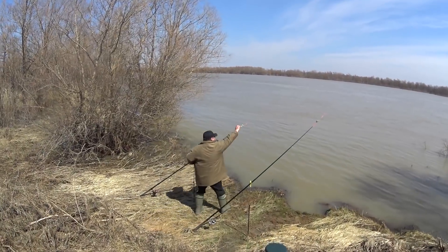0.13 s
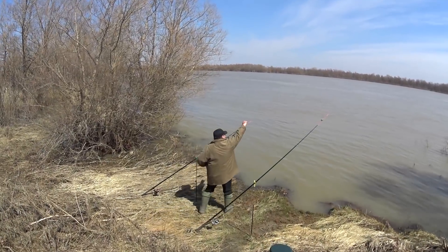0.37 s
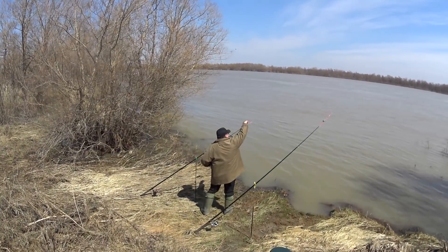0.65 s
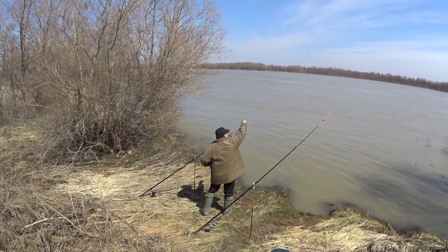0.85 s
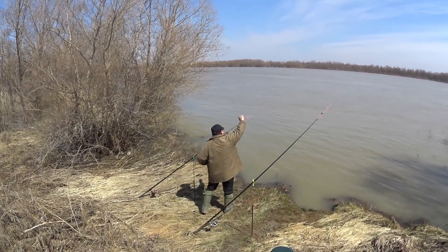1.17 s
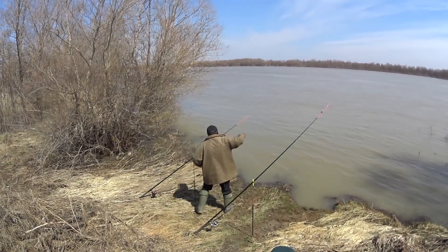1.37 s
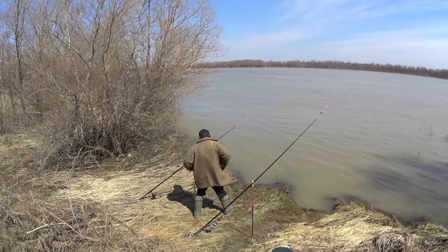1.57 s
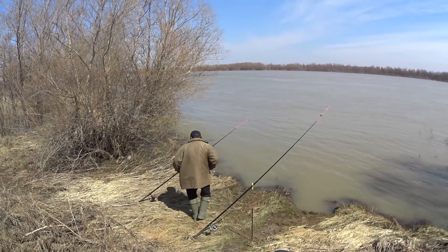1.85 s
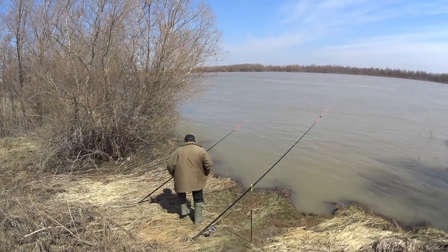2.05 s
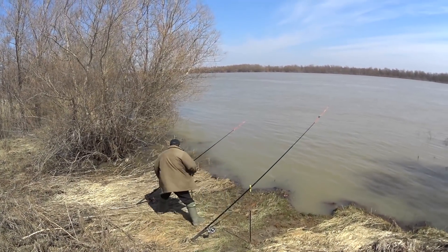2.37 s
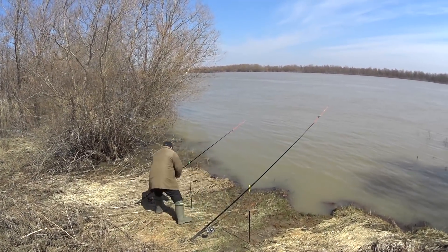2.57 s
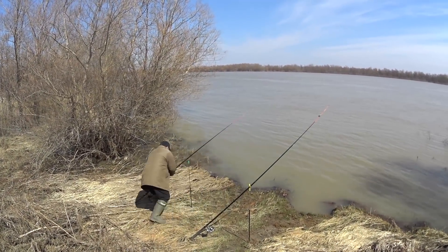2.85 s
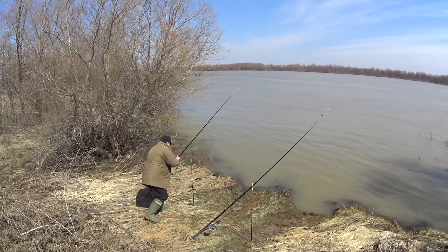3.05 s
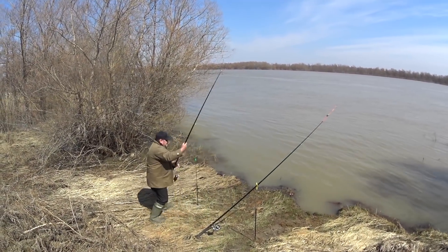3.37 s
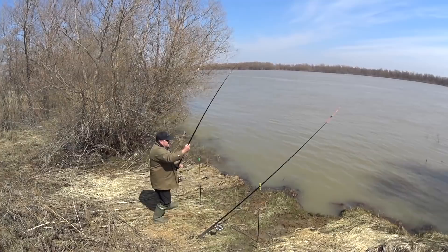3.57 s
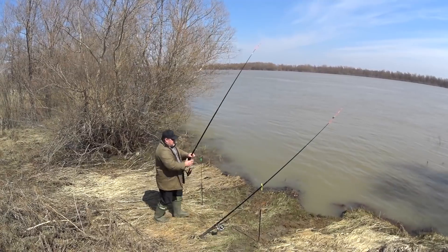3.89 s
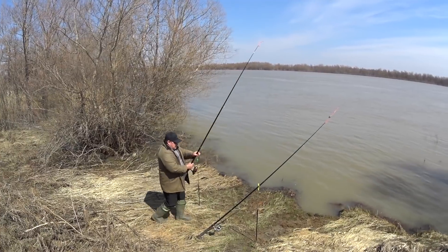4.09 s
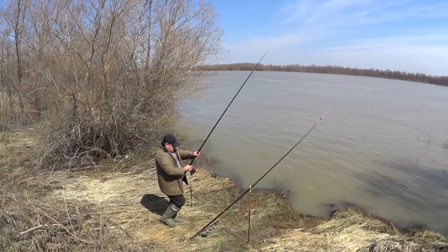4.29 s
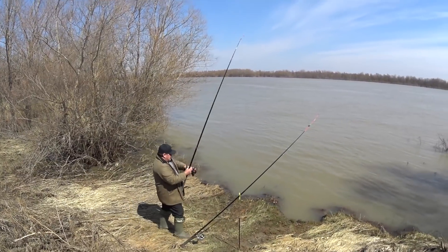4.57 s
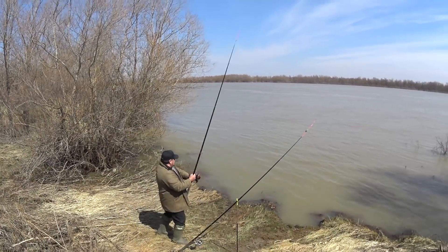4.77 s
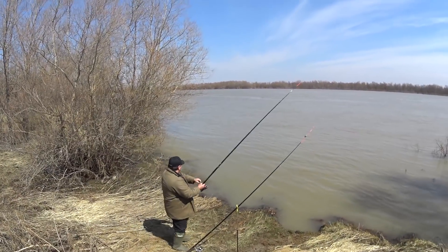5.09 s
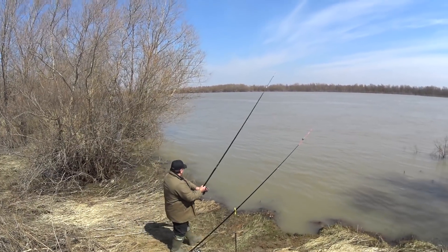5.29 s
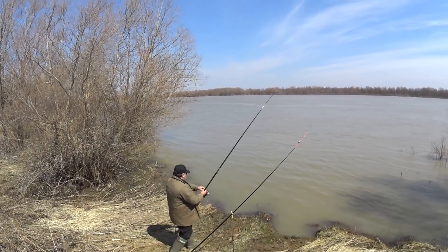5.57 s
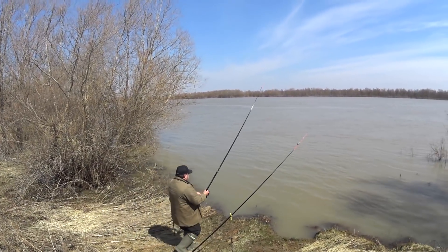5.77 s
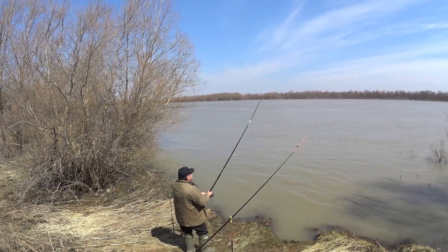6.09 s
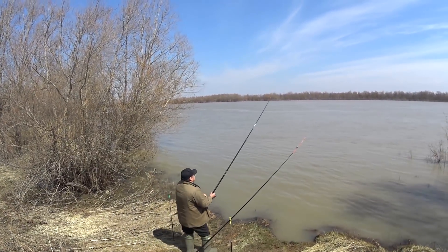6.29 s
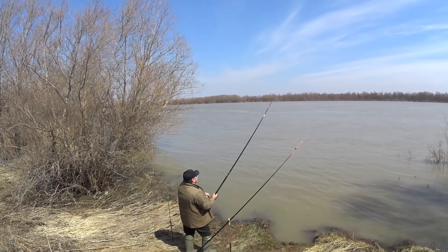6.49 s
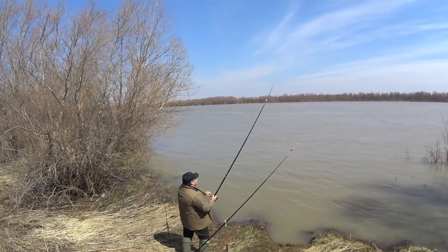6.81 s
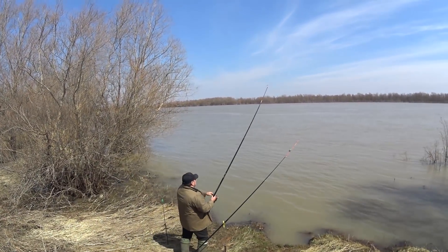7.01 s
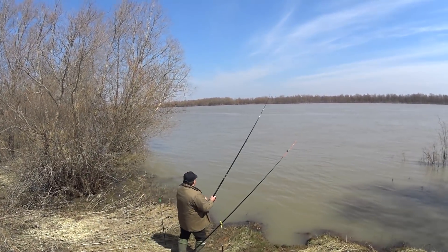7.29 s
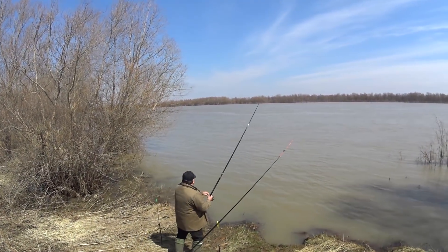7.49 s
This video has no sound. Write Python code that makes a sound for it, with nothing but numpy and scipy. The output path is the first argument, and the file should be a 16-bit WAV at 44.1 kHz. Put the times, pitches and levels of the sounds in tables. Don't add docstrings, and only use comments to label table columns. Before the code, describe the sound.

Two tiny bite bells jingle in an angler's hand, boots crackle through dry riverbank grass, then a reel whines in jerky bursts.

```python
import sys
import numpy as np
from scipy import signal
from scipy.fft import rfft, irfft, next_fast_len
from scipy.io import wavfile
from scipy.ndimage import uniform_filter1d, map_coordinates

SR = 44100
rng = np.random.default_rng(int(sys.argv[2]) if len(sys.argv) > 2 else 0)


def transcribe(signal):
    frames = np.atleast_2d(signal).T
    limited = np.clip(frames, -1, 1)
    pcm = np.round(limited * 32767).astype(np.int16)
    wavfile.write(sys.argv[1], SR, pcm)


def voltage_ratio(level):
    return 10 ** (np.asarray(level, float) / 20)


N = 337365


def unit(x):
    return x / np.sqrt(np.mean(x ** 2) + 1e-20)


def along(points, hz):
    f, value = np.transpose(points)
    return np.interp(np.log(hz + 1), np.log(f + 1), value)


def curves(rows):
    s, *columns = np.transpose(rows)
    return [np.interp(np.arange(N) / SR, s, column) for column in columns]


def wobble(rate):
    knots = rng.standard_normal(int(N * rate / SR) + 4)
    return map_coordinates(knots, [np.arange(N) * rate / SR])


def filtered(x, response):
    m = next_fast_len(N + SR // 2)
    return irfft(rfft(x, m) * response(np.fft.rfftfreq(m, 1 / SR)), m)[..., :N]


def coloured(x, spectrum):
    return unit(filtered(x, lambda hz: voltage_ratio(along(spectrum, hz))))


def modes(table):
    def response(f):
        total = 0
        for k, (centre, width, db) in enumerate(table):
            resonance = 1j * f * width / (centre * centre - f * f + 1j * f * width)
            total = total + (-1) ** k * voltage_ratio(db) * resonance
        return total
    return response


def crumbs(rate, spread_db, hiss):
    chance = rng.random((2, N))
    size_db = np.minimum(-spread_db * np.log(chance[1] + 1e-9), 11)
    breaks = (chance[0] < rate / SR) * voltage_ratio(size_db) * rng.choice([-1, 1], N)
    share = np.clip(hiss, 0, 1)
    return np.sqrt(1 - share) * unit(breaks) + np.sqrt(share) * rng.standard_normal(N)


def ring(hz, t60, t, attack):
    return np.sin(2 * np.pi * hz * t) * voltage_ratio(-60 * t / t60) * (1 - np.exp(-t / attack))


def add(track, s, sound):
    track[max(round(s * SR), 0):][:len(sound)] += sound


def swells(rows, bed_db):
    t = np.arange(0, N + 32, 32) / SR
    s, db, rise, fall = np.transpose(rows)[:, :, None]
    distance = np.where(t < s, (s - t) / np.abs(rise), (t - s) / np.abs(fall))
    drop_db = 10 * distance ** 1.18
    power = voltage_ratio(2 * (db - drop_db)).sum(0)
    return np.sqrt(np.interp(np.arange(N) / SR, t, power) + voltage_ratio(2 * bed_db))


def scuffs(table, body):
    t = np.arange(N) / SR
    swell = sum(voltage_ratio(db) * np.exp(-((t - s) / half) ** 2) for s, half, db in table)
    return swell * voltage_ratio(2 * wobble(59.66)) * unit(filtered(rng.standard_normal(N), modes(body)))


# (time [s], peak level [dB], pitch [Hz], time to fall 60 dB [s])
HIGH_STRIKES = [(0.3242, -46, 4500, 0.09), (0.4534, -48, 4440, 0.09), (0.4688, -45.5, 4440, 0.079),
                (0.5112, -44, 4490, 0.082), (0.5327, -38.5, 4490, 0.09), (0.543, -37, 4440, 0.09),
                (0.5638, -36, 4460, 0.1), (0.6429, -36, 4470, 0.11), (0.6963, -33, 4530, 0.078),
                (0.7244, -38, 4450, 0.09), (0.7444, -38, 4480, 0.09), (0.8222, -31, 4480, 0.09),
                (0.8318, -31, 4450, 0.11), (0.866, -37.5, 4470, 0.13), (0.9557, -43, 4480, 0.11),
                (0.9852, -36.5, 4480, 0.061), (1.021, -36, 4480, 0.12), (1.1401, -42, 4460, 0.09),
                (1.263, -38.5, 4470, 0.09), (1.3453, -40, 4470, 0.11), (1.7404, -36.5, 4480, 0.077),
                (1.8961, -53, 4410, 0.09), (1.9834, -36, 4480, 0.09), (2.0323, -38, 4470, 0.09),
                (2.0494, -38, 4450, 0.09), (2.0867, -29.5, 4450, 0.094), (2.2225, -37, 4570, 0.08),
                (2.4438, -39.5, 4550, 0.084), (2.501, -36.5, 4460, 0.1), (2.6017, -34.5, 4400, 0.086)]
# (time [s], peak level [dB], pitch [Hz], time to fall 60 dB [s])
HIGH_HELD = [
    (0.9736, -37, 4500, 0.035),
    (1.233, -35, 4410, 0.032),
    (1.4112, -34, 4490, 0.031),
    (1.5434, -36, 4540, 0.038),
    (1.5533, -35, 4420, 0.032),
    (1.6247, -39, 4570, 0.038),
    (1.863, -42, 4460, 0.035),
]
# (time [s], peak level [dB], pitch [Hz], time to fall 60 dB [s])
LOW_STRIKES = [(0.5427, -39, 4220, 0.07), (0.6117, -37, 4100, 0.07), (0.6246, -36, 4100, 0.087),
               (0.6448, -34, 4100, 0.092), (0.7078, -30.5, 4320, 0.07), (0.7426, -32, 4100, 0.07),
               (0.754, -31, 4100, 0.084), (1.092, -39, 4230, 0.074), (1.232, -37, 4210, 0.064),
               (1.2645, -35.5, 4120, 0.07), (1.2987, -33, 4100, 0.083), (1.3199, -36, 4100, 0.07),
               (1.3446, -38.5, 4090, 0.084), (1.384, -40, 4130, 0.062), (1.4112, -42, 4210, 0.07),
               (1.8392, -29.5, 4200, 0.061), (1.9907, -31, 4220, 0.076), (2.0994, -35.5, 4230, 0.07),
               (2.195, -26.5, 4100, 0.07), (2.4618, -43, 4000, 0.07), (2.6068, -27, 4070, 0.057)]
# (time [s], peak level [dB], pitch [Hz], time to fall 60 dB [s])
LOW_HELD = [
    (0.8649, -34, 3920, 0.035),
    (1.1594, -48, 4020, 0.035),
    (1.555, -33.5, 3960, 0.035),
    (1.7245, -43, 4300, 0.035),
    (1.8004, -37, 3940, 0.035),
    (1.8083, -35, 4200, 0.032),
]
# (time [s], peak level [dB], pitch [Hz])
SHELL_CLINKS = [(0.5102, -43, 5080), (0.5317, -41, 5070), (0.5487, -40, 5030), (0.6105, -38, 5070),
                (0.6429, -35, 5010), (0.693, -33, 4800), (0.7064, -34, 4780), (0.7214, -34, 4840),
                (0.7422, -34, 4980), (0.7564, -33, 5080), (0.8215, -28, 4760), (0.8714, -37, 5000),
                (0.9727, -42, 4710), (1.0201, -44, 4760), (1.2316, -53, 4880), (1.2615, -46, 4900),
                (1.2974, -42, 5620), (1.4104, -36, 4850), (1.4347, -25.5, 4730), (1.472, -36, 5540),
                (1.5434, -36, 4830), (1.5544, -37, 4820), (1.7399, -36, 4850), (1.7589, -43, 4980),
                (1.8093, -39, 5300), (1.8412, -35.5, 5000), (1.8622, -41, 5070), (2.0857, -35, 4910),
                (2.1934, -29, 5630)]
# (multiple of the pitch [ratio], level [dB])
HIGH_SHELL = [(1, 0.5), (.955, -9.5), (1.99, -13.5)]
LOW_SHELL = [(1, 1), (.957, -8), (1.035, -7), (2.02, -10)]
CLINK_SHELL = [(1, 1.5), (1.07, -4), (1.15, -8)]
# (pitch [Hz], width [Hz], level [dB])
ROLLING_PELLETS = [(4100, 200, -1.5), (4470, 160, 2), (5000, 500, -7)]


def bells():
    rebound_s, rebound_db = 0.011, -7
    out, t = np.zeros(N + SR), np.arange(SR // 8) / SR
    clinks = [(*row, 0.024) for row in SHELL_CLINKS]
    groups = [(HIGH_STRIKES + HIGH_HELD, HIGH_SHELL, 0.3),
              (LOW_STRIKES + LOW_HELD, LOW_SHELL, -1.5),
              (clinks, CLINK_SHELL, -1.5)]
    for strikes, shell, gain_db in groups:
        luck = rng.standard_normal((len(strikes), 3, 6))
        for (s, db, hz, t60), bounces in zip(strikes, luck):
            for k, chance in enumerate(bounces):
                sound = 0
                for (ratio, level), uneven in zip(shell, chance):
                    sound = sound + voltage_ratio(level + 1.2 * uneven) * ring(hz * ratio, t60, t, attack=0.00087)
                delay = k * rebound_s * (1 + 0.3 * np.tanh(chance[-1]))
                add(out, s + delay, voltage_ratio(db + gain_db + rebound_db * k) * sound)
    struck = out[:N] * voltage_ratio(2 * wobble(220))
    shaking = np.sqrt(np.abs(uniform_filter1d(struck ** 2, size=2600)))
    rolling = unit(filtered(crumbs(rate=500, spread_db=4, hiss=0.3), modes(ROLLING_PELLETS)))
    return struck + voltage_ratio(-8) * shaking * rolling


# (time [s], tooth rate [Hz], tooth tone [dB], its octave [dB])
FIRST_CRANKING = [(5.0, 1290, -63, -55), (5.32, 1253, -64, -55.5), (5.375, 1162, -60, -49),
                  (5.42, 1200, -70, -56), (5.47, 1284, -69, -63), (5.565, 2080, -58, -63),
                  (5.605, 2800, -47.5, -60), (5.64, 1950, -51, -65), (5.668, 3300, -48, -42),
                  (5.697, 2050, -52, -60), (5.73, 2680, -45, -43), (5.77, 1600, -65.5, -67),
                  (5.818, 2577, -42.5, -51), (5.86, 1800, -60, -70), (5.897, 2745, -46, -58),
                  (5.94, 1600, -51, -60), (5.978, 2720, -51, -44), (6.005, 2050, -54, -55),
                  (6.035, 2794, -48, -44), (6.088, 1550, -46, -48.5), (6.117, 2620, -47, -43),
                  (6.16, 2046, -50.5, -54), (6.205, 2083, -49.5, -38), (6.245, 1503, -48, -53),
                  (6.265, 1450, -66, -66), (6.298, 2016, -47, -47), (6.33, 1500, -58, -59),
                  (6.38, 1398, -72, -78)]
SECOND_CRANKING = [(6.9, 1051, -70, -67), (6.975, 1427, -57.5, -50.5), (7.04, 993, -63, -57),
                   (7.11, 1501, -60, -51.5), (7.17, 1250, -68, -63), (7.232, 1960, -47, -47),
                   (7.275, 1417, -64, -58), (7.325, 2250, -50.5, -49), (7.36, 1450, -59, -51),
                   (7.385, 1550, -53, -58), (7.42, 2377, -53, -40.5), (7.455, 1955, -52.5, -48),
                   (7.495, 2894, -52, -42), (7.53, 1850, -58.5, -45), (7.56, 2800, -58, -44.5),
                   (7.605, 1747, -57.5, -53), (7.648, 2150, -63, -46.5)]
# (time [s], effort [dB], line tension [dB])
CRANK_EFFORT = [(4.92, -80, -84), (4.964, -52, -75), (5.303, -51.5, -54), (5.45, -53, -51),
                (5.812, -45, -45), (5.857, -58.5, -71), (5.93, -47.5, -46), (6.3, -45, -64),
                (6.425, -53.5, -63), (6.46, -85, -79), (6.68, -86, -85), (6.725, -54.5, -62),
                (6.805, -53, -57), (7.054, -56, -54), (7.1, -49, -51), (7.174, -50.5, -58),
                (7.333, -47.5, -51), (7.638, -44.5, -55.5)]
# (pitch [Hz], width [Hz], level [dB])
REEL_HOUSING = [(950, 44, -22), (1360, 60, -19), (1677, 190, -6.5), (2150, 18, 2.5), (2306, 45, 5),
                (2577, 17, 1.5), (2920, 170, -7.5), (3520, 30, 0.5), (4180, 134, -1), (4870, 60, -2.5),
                (5380, 280, -5), (6660, 130, -2.5)]
# (pitch [Hz], width [Hz], level [dB])
LINE_ROLLER = [(7880, 210, 4), (8350, 320, -1), (9270, 180, -8.5)]


def reel():
    s, *points = np.transpose(FIRST_CRANKING + SECOND_CRANKING)
    gear_db, roller_db = curves(CRANK_EFFORT)
    place = np.interp(np.arange(N) / SR, s, np.arange(len(s)))
    k = np.minimum(place.astype(int), len(s) - 2)
    ease = (1 - np.cos(np.pi * (place - k))) / 2
    hz, tone_db, octave_db = (v[k] + ease * (v[k + 1] - v[k]) for v in points)

    uneven_hz = hz * (1 + 0.031 * wobble(400))
    turn = 2 * np.pi * np.cumsum(uneven_hz) / SR
    teeth = np.zeros(N)
    for n, db in [(0.5, tone_db - 11), (1, tone_db + 3), (1.5, octave_db - 4), (2, octave_db + 4.5),
                  (3, octave_db - 9)]:
        teeth += voltage_ratio(db + 3 * wobble(160) + 2.6 * wobble(50) - 1.5) * np.sin(n * turn)
    whine = np.minimum(voltage_ratio(gear_db + 57), 1) * teeth

    load = hz / uniform_filter1d(hz, size=5000)
    grind_gain = voltage_ratio(gear_db + 8.5 + 4 * wobble(32)) * load ** 0.5
    grind = grind_gain * crumbs(rate=4000, spread_db=1.5, hiss=0.8)
    hiss = voltage_ratio(roller_db + 13 + 1.5 * wobble(25)) * load ** 0.7 * rng.standard_normal(N)

    body = modes(REEL_HOUSING)
    whine = filtered(whine, lambda f: 0.42 + voltage_ratio(3.5) * body(f))
    grind = filtered(grind, lambda f: body(f) + 0.21 * (f > 1200))
    return whine + grind + filtered(hiss, modes(LINE_ROLLER))


# (time of peak [s], crackle level [dB], 10 dB rise [s], 10 dB fall [s])
STALK_SWEEPS = [(.04, -51, 4, 0), (.215, -52.5, 0, 0.31), (.622, -53, 0.07, 0.08),
                (.753, -50.5, 0.02, 0.15), (1.357, -57.5, -0.15, 0), (1.63, -53, 0.12, .06),
                (1.8, -55.5, 0.26, 0.1), (1.965, -50, 0.06, -0.5), (2.125, -42, 0.02, 0.16),
                (2.185, -38, 0.0553, 0.11), (2.26, -39.5, 0.0966, 0.11), (2.35, -37.5, 0.0961, 0.0648),
                (2.614, -46, 0.08, 0.23), (2.76, -44.5, 0.17, 0.38), (3.253, -52.5, -1.6, 0.22),
                (3.457, -57, -0.9, 0.4), (3.79, -39, 0.07, 0.07), (4.036, -46, 0.13, 0),
                (4.146, -54.5, 0.6, 0.33), (4.305, -43.5, 0.06, 0.066), (4.53, -44.5, 0.08, 0.07),
                (5.034, -62, 0.8, 0.25), (5.3, -54.5, -0.02, 0.27), (5.83, -54.5, 0.03, 0.3),
                (5.986, -43.5, 0.17, 0.1255), (6.13, -50, 0.15, 0.04), (6.241, -48, 0.19, -0.01),
                (7.498, -64, -0.7, -0.1)]
# (time of peak [s], crush level [dB], 10 dB rise [s], 10
# dB fall [s])
SOLE_PRESSES = [(0, -58, .1, -0.5), (.249, -56.5, -2, 0.7), (1.417, -58.5, 1, 0.4), (1.8, -58, 0.3, 0),
                (2.175, -54.5, -0.4, 0.7), (2.449, -52.5, -0.03, 0.07), (2.634, -48, 0.02, -0.12),
                (2.749, -48, 0, 0.14), (3.238, -61.5, 0.4, -0.8), (3.79, -59, 0.5, 0.5),
                (4.141, -62.5, -0.2, 0.24), (4.53, -52, 0.04, 0.16), (5.986, -58, 0.15, 0.25),
                (1.958, -44, .005, .09),
]
# (time [s], level [dB])
RESTLESS_FEET = [
    (1.5, -62),
    (1.9, -69),
    (2.5, -64),
    (3.0, -63),
    (4.6, -60),
    (4.95, -65),
    (5.7, -60),
    (6.3, -59),
    (6.44, -71.5),
    (7.65, -67),
]
# (frequency [Hz], level per Hz [dB])
STALK_COLOUR = [(710, -38), (1200, -16), (3270, -16.5), (4060, -10), (8370, -2), (10400, -2.5),
                (11300, -6.5), (14700, -79), (22000, -120)]
TURF_COLOUR = [(88, -29), (150, -11.5), (365, -5.5), (1100, -7), (1400, -11.5), (3000, -13.5),
               (3900, -15.5), (6600, -120)]


def grass():
    clumps = 0.7 * wobble(35)
    crackle = coloured(crumbs(rate=3000, spread_db=7.5, hiss=0.59), STALK_COLOUR)
    crush = coloured(crumbs(rate=500, spread_db=5.5, hiss=0.8), TURF_COLOUR)
    shuffle_db, = curves(RESTLESS_FEET)
    turf_bed_db = -62 + 0.19 * (shuffle_db - shuffle_db.mean())
    stalks = swells(STALK_SWEEPS, shuffle_db) * voltage_ratio(6.5 + 2.35 * clumps + 0.99 * wobble(120))
    turf = swells(SOLE_PRESSES, turf_bed_db) * voltage_ratio(0.4 * clumps + 1.93 * wobble(25))
    return stalks * crackle + turf * crush


# (time [s], peak level [dB], pitch [Hz], low crack level [dB])
THIN_TWIGS = [(0.046, -27, 10500, -36), (0.0493, -24.5, 8960, -31), (0.0864, -32, 8040, -45.5),
              (0.335, -37.5, 7700, -13), (0.6225, -36, 8900, -28), (0.7434, -26, 8950, -40),
              (0.8758, -32.5, 8300, -31), (1.1138, -35, 10200, -30), (1.1513, -37, 6640, -43),
              (1.2981, -42, 9000, -30), (1.32, -37, 8600, -30), (1.3603, -37, 8500, -8.5),
              (1.555, -34.5, 7000, -22), (1.656, -38, 8000, -9), (2.44, -50, 7000, -3),
              (2.649, -44, 6000, 3), (2.737, -42, 8260, -4), (3.79, -42, 8000, 3), (3.2549, -29, 8350, -16),
              (3.458, -34, 7550, -17), (3.7473, -33, 8350, -16), (4.0067, -31, 8450, -22),
              (4.208, -38, 6880, -3.5), (4.675, -37.5, 9150, -13), (4.9013, -40.5, 9440, -6),
              (5.2078, -39, 9450, -10), (5.434, -22.5, 6070, -51), (6.8324, -36, 9340, -22),
              (7.5805, -38, 8350, -5)]
# (time [s], peak level [dB], pitch [Hz], low crack level [dB])
THICK_TWIGS = [
    (2.8547, -23, 9800, -11),
    (3.4675, -29.5, 8250, -65),
    (4.1339, -28.5, 9590, -38),
    (4.163, -33.5, 9500, -29),
    (4.5355, -26, 7220, -24),
]


def twigs():
    out, t = np.zeros(N + SR), np.arange(SR // 40) / SR
    thin = [(*row, 0.015) for row in THIN_TWIGS]
    thick = [(*row, 0.048) for row in THICK_TWIGS]
    for s, db, hz, low_db, t60 in sorted(thin + thick):
        click = ring(hz, 0.0038, t, attack=0.00004) + 0.32 * ring(0.88 * hz, 0.0027, t, attack=0.00003)
        crack = ring(2020, 0.0064, t, attack=0.00005) + 1.2 * ring(3170, 0.006, t, attack=0.00005)
        splinters = 0.3 * voltage_ratio(-60 * t / t60) * np.diff(rng.standard_normal(len(t) + 1))
        add(out, s, voltage_ratio(db + 7.5) * (click + voltage_ratio(low_db - 0.5) * crack + splinters))
    return out[:N]


# (time [s], peak level [dB], pitch [Hz])
BOOT_THUDS = [(0.874, -42.5, 617), (0.987, -42.5, 1090), (1.359, -42, 334), (1.963, -29.5, 800),
              (2.005, -34, 636), (2.098, -46, 510), (2.173, -32.5, 570), (2.185, -31.5, 1027),
              (2.433, -33.5, 538), (2.436, -38.5, 1050), (2.62, -41.5, 420), (2.737, -43, 1180),
              (2.759, -41.5, 530), (2.955, -36.5, 457), (3.221, -45.5, 576), (3.456, -49, 1220),
              (4.205, -47, 1230), (4.521, -41, 450), (3.783, -38.5, 472), (3.803, -41.5, 493),
              (4.118, -43.5, 910), (4.134, -43, 1000), (4.162, -45.5, 1140), (4.539, -41.5, 444),
              (5.027, -47.5, 440), (5.206, -44.5, 1130)]


def boots():
    out, grit, t = np.zeros(N + SR), np.zeros(N + SR), np.arange(SR // 12) / SR
    for s, db, hz in BOOT_THUDS:
        knock = ring(hz * (1 + 12 * t), 0.023, t, attack=0.0018)
        knock += 0.47 * ring(1.44 * hz, 0.01, t, attack=0.0011)
        push = voltage_ratio(-12.0) * (500 / hz) * ring(148, 0.029, t, attack=0.0029)
        add(out, s, voltage_ratio(db + 7) * (knock + push))
        add(grit, s, voltage_ratio(db - 5.0 - 60 * t / 0.047) * (1 - np.exp(-t / 0.0027)))
    return out[:N] + grit[:N] * coloured(rng.standard_normal(N), TURF_COLOUR)


# (time [s], peak level [dB], pitch [Hz])
STALK_TICKS = [(3.4953, -37, 5600), (3.7832, -26, 5280), (3.8361, -32, 5960), (3.9643, -42, 4520),
               (4.0067, -36, 5690), (4.1104, -36, 4200), (4.1339, -32.5, 4540), (4.1623, -32, 5620),
               (4.1888, -36, 4440), (4.2067, -36, 4370), (4.3125, -35.5, 6490), (4.521, -32, 5740),
               (4.535, -42, 3310), (4.535, -26, 5440), (4.6742, -40, 4120), (4.9061, -40, 5180)]
# (pitch [Hz], level [dB], time to fall 60 dB [s])
HOLLOW_ROOT = [
    (498, -45, .07),
    (1930, -38, 0.064),
    (1550, -48, .04),
]


def ticks():
    out, t = np.zeros(N + SR), np.arange(SR // 12) / SR
    for s, db, hz in STALK_TICKS:
        add(out, s, voltage_ratio(db + 0.5) * ring(hz, 0.0083, t, attack=0.00022))
    for hz, db, t60 in HOLLOW_ROOT:
        add(out, 3.782, voltage_ratio(db) * ring(hz, t60, t, attack=0.003))
    return out[:N]


# (time [s], half length [s], level [dB])
SLEEVE_RUBS = [
    (1.105, 0.014, -54),
    (1.21, 0.013, -56.5),
    (1.28, 0.015, -51.5),
    (1.33, 0.038, -56),
    (1.41, 0.036, -49.5),
]


def sleeve():
    return scuffs(SLEEVE_RUBS, [(1000, 74, 0)])


# (time [s], half length [s], level [dB])
PAIL_NUDGES = [
    (.2, 0.033, -50),
    (.228, 0.033, -48.5),
    (.25, 0.022, -48.5),
    (.3, 0.024, -52),
    (.44, 0.044, -51),
]
# (pitch [Hz], width [Hz], level [dB])
PAIL_BODY = [(365, 55, 3), (803, 71, -2), (1080, 58, -3.5), (1564, 42, -5), (2000, 59, -10),
             (3030, 110, -14.5)]


def pail():
    return scuffs(PAIL_NUDGES, PAIL_BODY)


# (time [s], level [dB])
BREEZE_LEVEL = [
    (0, -65.5),
    (.22, -60),
    (.6, -64),
    (1.2, -64),
    (1.38, -52.5),
    (1.5, -65.5),
    (7.65, -69),
]
# (frequency [Hz], level per Hz [dB])
SHARED_HISS = [(120, -20), (250, -11), (1000, -20.5), (4000, -14), (11300, -24)]
DIFFERING_HISS = [(120, -17.5), (300, -8), (1000, -7), (4000, -15), (11300, -24)]
RUMBLE_COLOUR = [(12, -38), (25, -7.5), (70, -1), (150, -2.5), (300, -10), (600, -74)]


def air():
    mid = voltage_ratio(-61.0 + 2.5 * wobble(2.72)) * coloured(rng.standard_normal(N), SHARED_HISS)
    side = voltage_ratio(-56.5 + 0.64 * wobble(3.0)) * coloured(rng.standard_normal(N), DIFFERING_HISS)
    gust = voltage_ratio(curves(BREEZE_LEVEL)[0] + 0.45 * wobble(8.4))
    mid = mid + gust * coloured(rng.standard_normal(N), RUMBLE_COLOUR)
    side = side + voltage_ratio(-16) * gust * coloured(rng.standard_normal(N), RUMBLE_COLOUR)
    return np.array([mid + side, mid - side])


# (frequency [Hz], level under the sum [dB])
BUSH_ECHOES = [(100, -9), (350, -6), (1100, -2.5), (3600, -9), (6500, -17.5), (11000, -11.5)]
# (frequency [Hz], phase [radians])
LEFT_LEAD = [(50, -0.15), (780, -0.13), (1800, -0.46), (5250, 0.48), (11000, 0.22)]


def ports(x, pan_db, lead, scatter_db):
    t = np.arange(SR // 20) / SR
    tail = rng.standard_normal(len(t)) * voltage_ratio(-60 * t / 0.045)
    smear = signal.fftconvolve(x, tail / np.linalg.norm(tail))[:N]
    side = filtered(smear, lambda hz: voltage_ratio(along(BUSH_ECHOES, hz) + scatter_db))
    half = np.array([[0.5], [-0.5]])
    direct = filtered(x, lambda hz: voltage_ratio(pan_db * half) * np.exp(1j * lead * half * along(LEFT_LEAD, hz)))
    return direct + 2 * half * side


def scene():
    hand = ports(bells() + sleeve(), pan_db=0.0, lead=0.45, scatter_db=-2.5)
    cranking = ports(reel(), pan_db=-1.0, lead=0.35, scatter_db=-6.0)
    ground = ports(grass() + twigs() + boots() + ticks(), pan_db=1.5, lead=0.57, scatter_db=-4.0)
    bucket = ports(pail(), pan_db=-0.5, lead=1.5, scatter_db=6)
    return hand + cranking + ground + bucket + air()


def roll_off(x):
    return signal.sosfilt(signal.butter(12, 12300, fs=SR, output="sos"), x)


def record(dry):
    mix = filtered(dry, lambda hz: 1 / (1 + (hz / 11000) ** 90) + voltage_ratio(-77) * (hz < 14500))
    return roll_off(mix)


dry = scene()
out = record(dry)
transcribe(out)
```